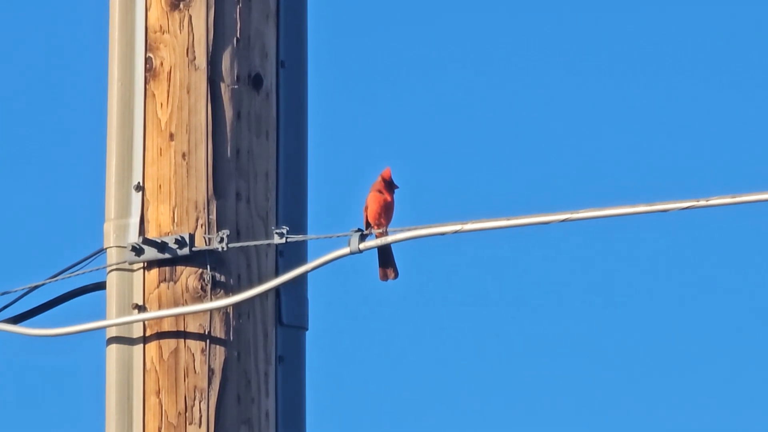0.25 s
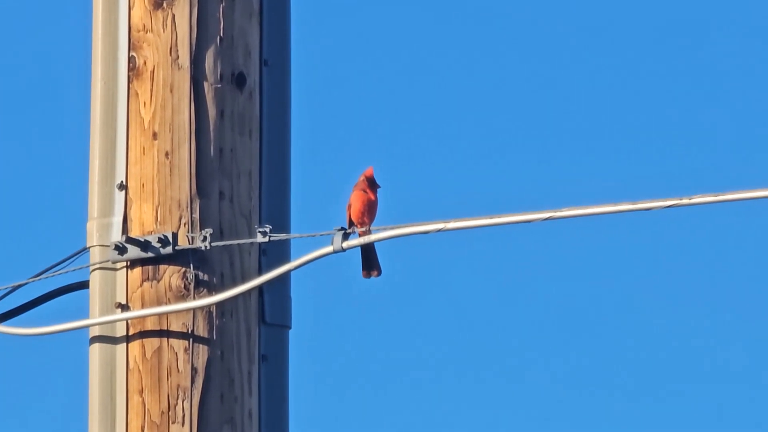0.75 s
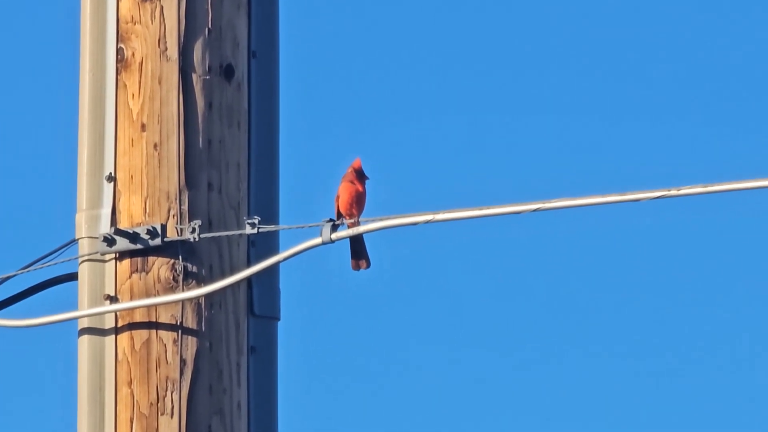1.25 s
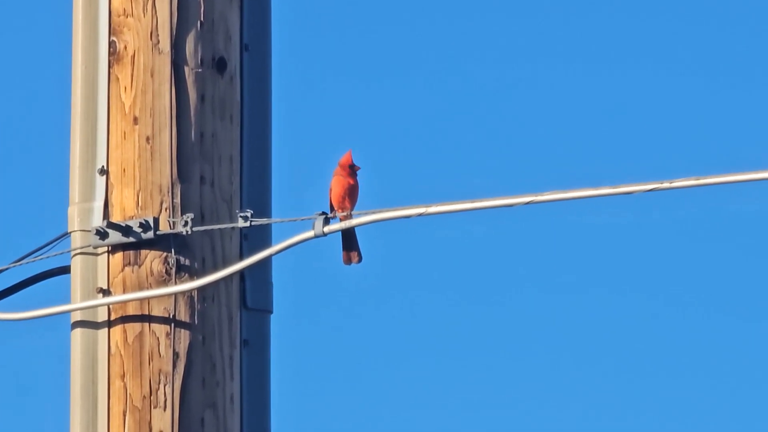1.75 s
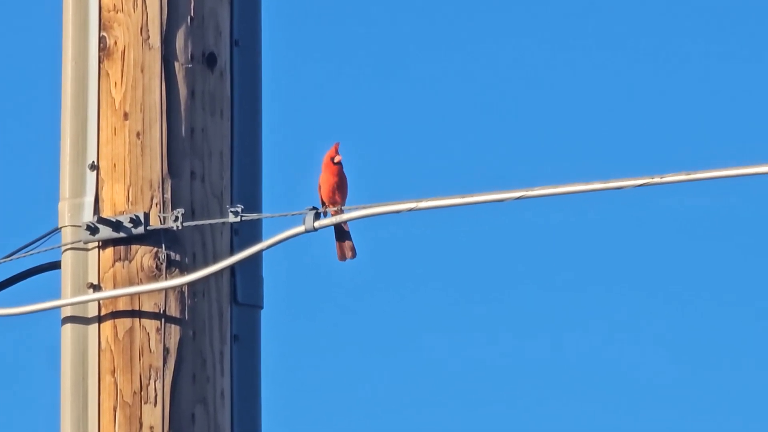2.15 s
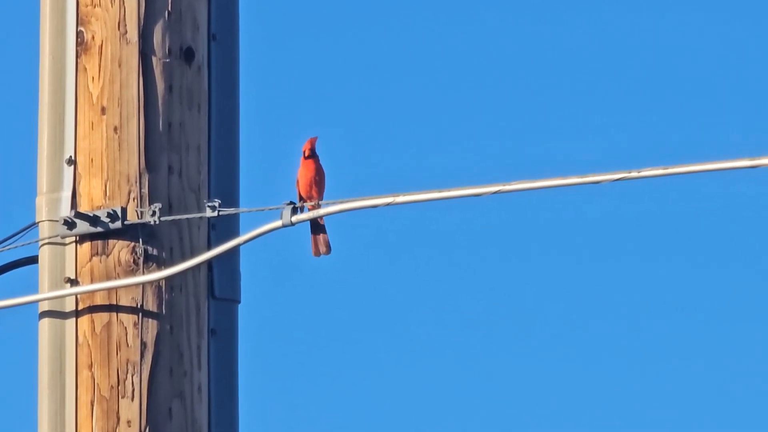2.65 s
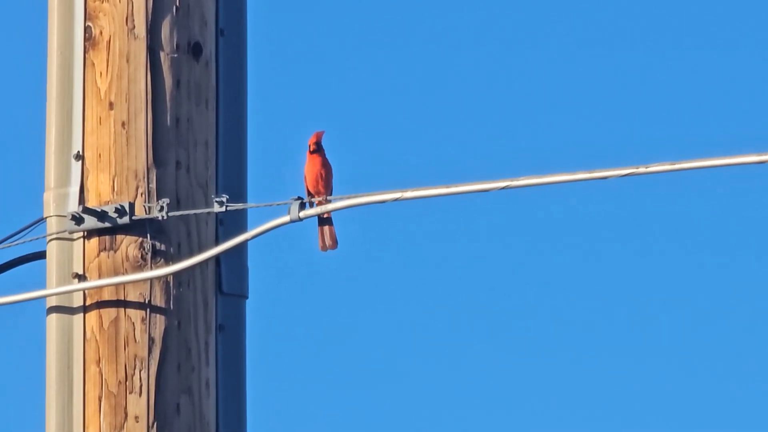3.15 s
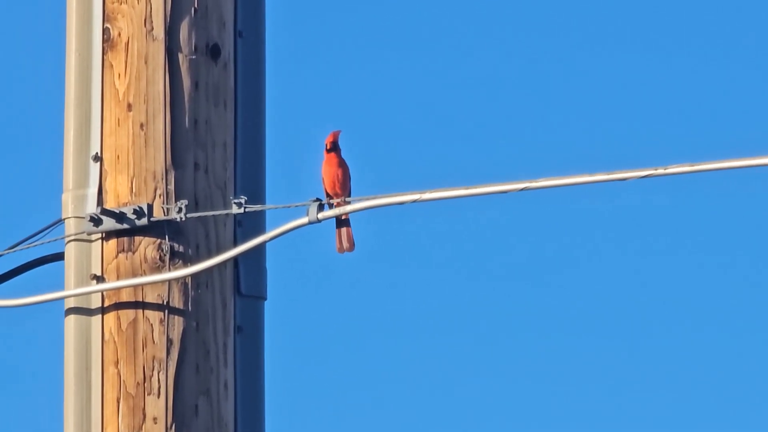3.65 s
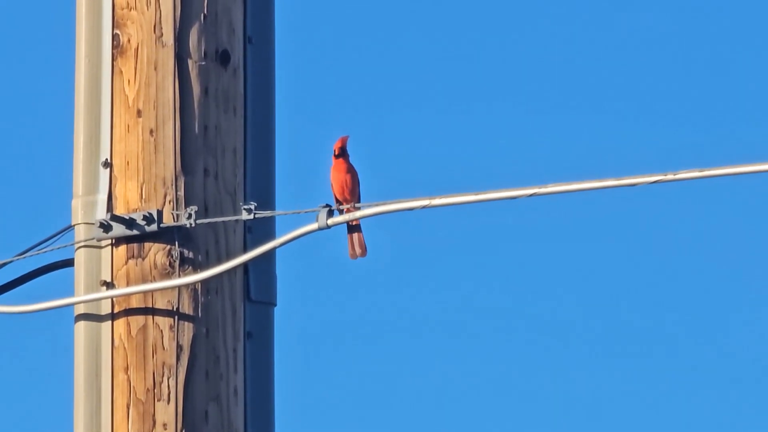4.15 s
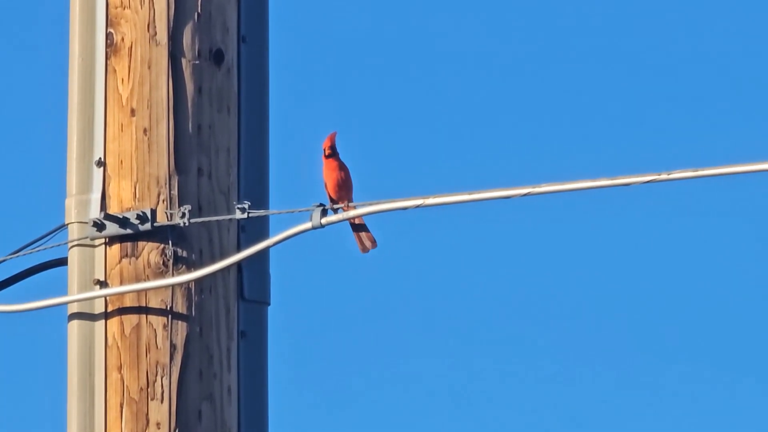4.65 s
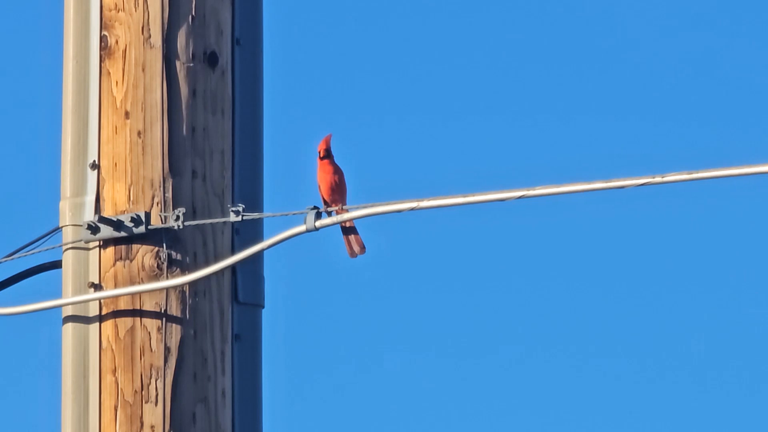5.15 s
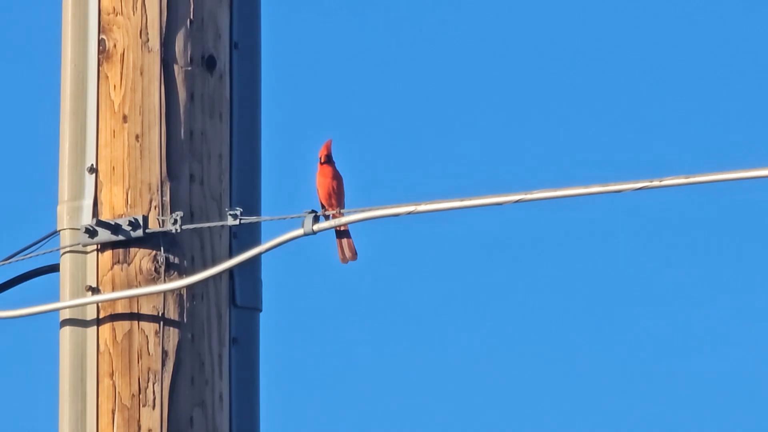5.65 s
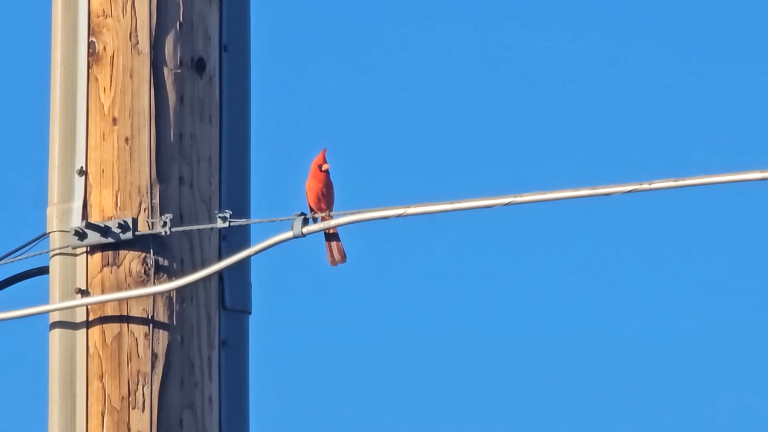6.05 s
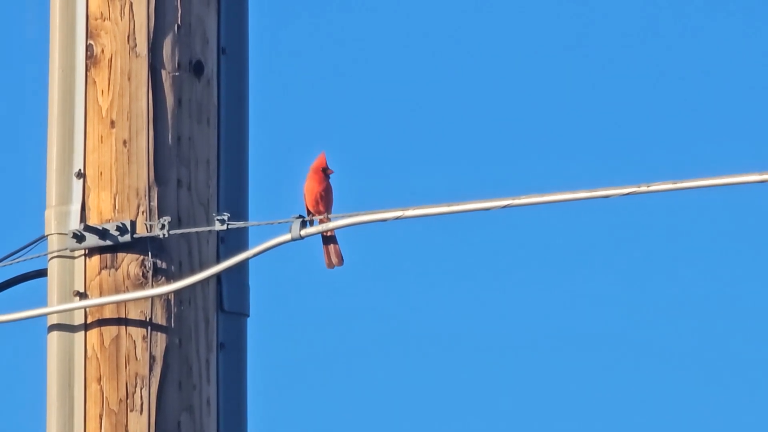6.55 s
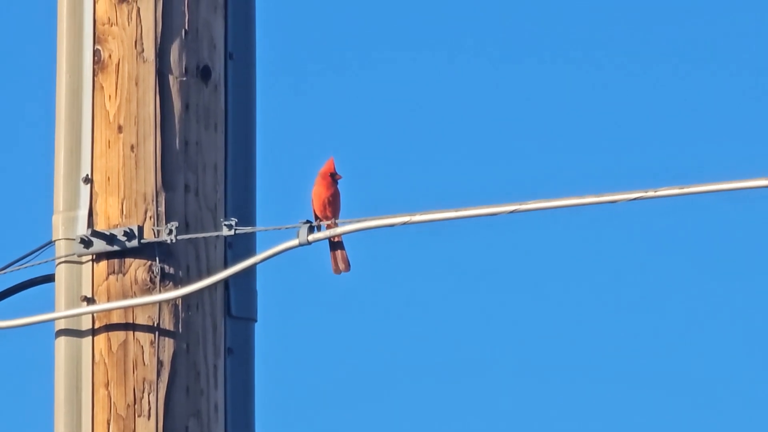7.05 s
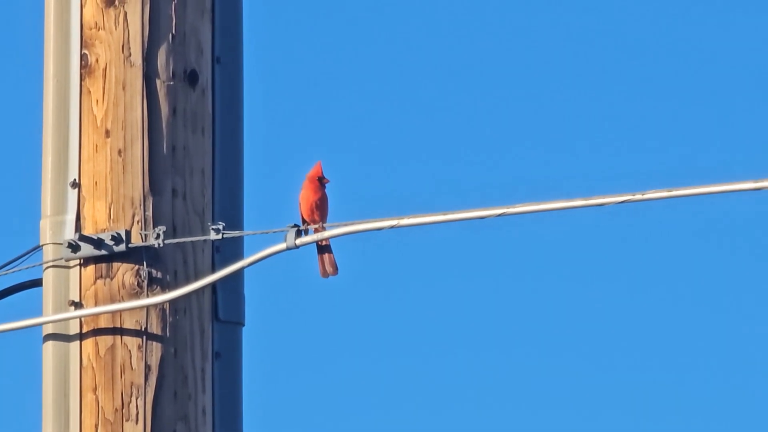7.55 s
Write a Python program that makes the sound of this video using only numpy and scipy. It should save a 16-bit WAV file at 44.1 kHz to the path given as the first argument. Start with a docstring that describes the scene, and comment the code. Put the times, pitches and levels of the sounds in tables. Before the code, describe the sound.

Outdoors by a street, traffic rumbles steadily while a distant engine drones and faint birds chirp far away. After about two seconds a cardinal sings three thin rising notes, growing louder, then ten clear, quick, down-slurred whistles with a short echo. The song stops and the rumble and far chirps carry on. A hand rustles faintly on the microphone.

```python
"""Cardinal over a street.

A cardinal on a wire sings three rising notes, then ten arched, down-slurred whistles, using both sides
of its syrinx. A close reflection ripples each glide; the street returns a short tail. Far birds answer.
Traffic rumbles, a distant engine pulls, a machine hums, and a hand rustles faintly on a camera grip."""
import sys
import numpy as np
from scipy import signal
from scipy.fft import rfft, irfft
from scipy.io import wavfile
from scipy.ndimage import uniform_filter1d

SR = 44100
rng = np.random.default_rng(int(sys.argv[2]) if len(sys.argv) > 2 else 0)


def master(y):
    """Save y as 16-bit WAV."""
    cut = np.clip(np.atleast_2d(y).T, -1, 1)
    pcm = np.round(cut * 32767)  # scale
    wavfile.write(sys.argv[1], SR, pcm.astype(np.int16))


N = 344421

# Note contours: offset_s, base_pitch_hz, relative_db
UPSLUR_SHAPE = [(-.125, 3940, -39), (-.1, 4310, -24), (-.07, 5010, -13), (-.055, 5270, -15.5),
                (-.04, 5960, -6), (-.025, 6400, -6), (-.01, 6520, -6), (0, 6840, -15), (.01, 6890, -16)]
DOWNSLUR_SHAPE = [(-.012, 3680, -15), (-.005, 3635, -8.5), (.005, 3520, -20), (.016, 3314, -5),
                  (.03, 2730, -9.5), (.045, 2550, -10.5), (.06, 2514, -29)]
HOOK_SHAPE = [(-.018, 3740, -22), (-.008, 3920, -16), (-.003, 4765, 4.5), (.002, 5144, 0), (.009, 4950, -1),
              (.016, 4410, -12.5), (.026, 3870, -23)]
FLICK_SHAPE = [(-.012, 3837, -21.5), (-.006, 3887, -27.5), (-.002, 4064, -12.5), (.003, 4540, -2.5),
               (.006, 5090, -21), (.008, 6200, -11.5), (.012, 6060, -15)]
SWOOP_SHAPE = [(-.07, 2506, -30), (-.057, 2393, -17.5), (-.039, 2078, -16.5), (-.028, 2230, -7.5),
               (-.008, 2828, -4.5), (.003, 2860, 0.5), (.014, 2580, -10), (.055, 1865, -8.5),
               (.095, 1350, -32)]
ARCH_SHAPE = [(-.047, 1852, -34), (-.038, 1850, -10), (-.021, 2330, -5), (-.01, 2684, -2), (.003, 2791, -1),
              (.02, 2425, -7), (.05, 1920, -7), (.08, 1455, -17), (.093, 1480, -24)]
# Rising notes: time_s, pitch_ratio, gain_db, overtone_boost_db
UPSLUR_NOTES = [(2.335, 0.93, -35, 21.6), (2.814, 0.97, -30, 12.7), (3.208, 0.97, -26.5, 7.6)]
# Other opening notes: time_s, pitch_ratio, gain_db
DOWNSLUR_NOTES = [(2.623, 0.99, -39), (3.02, 0.99, -31.5)]
HOOK_NOTES = [(3.308, 0.98, -32), (3.543, 0.92, -33.5)]
SWOOP_NOTES = [(3.367, 1.012, -23), (3.61, 0.98, -22)]
# Quick run, flick then arch: arch_top_s, arch_pitch_ratio, flick_pitch_ratio, gain_db
RUN_SYLLABLES = [(3.8528, 1.023, 0.91, -23.5), (4.091, 1.02, 0.91, -23.5), (4.3249, 1, 0.9, -23),
                 (4.56, 1.01, .94, -22.5), (4.7936, 1.003, 0.92, -22), (5.0268, 1.004, 0.93, -22.5),
                 (5.2618, 1, 0.9, -22.5), (5.4987, .99, 0.9, -23)]
# Syrinx overtones: harmonic, high_side_db, low_side_db
SYRINX_OVERTONES = [(2, -37.5, -39), (3, -61, -49), (4, -64, -67), (5, -64, -50), (6, -70, -47.5)]
# Wall reflections: delay_ms, left_db, right_db
WALL_ECHOES = [(13.94, -10, -17), (21, -18.5, -17.5), (34.7, -24, -26.5), (47.9, -25, -23),
               (66, -35.5, -34), (92, -45.5, -43)]
# Street decay: freq_hz, base_t60_s
STREET_DECAY = [(1500, 0.7), (3000, 0.5), (5000, 0.83), (8000, 0.15), (15000, 0.14)]
# Microphone port response toward the bird: freq_hz, gain_db
LEFT_RESPONSE = [(1500, -8.5), (2800, 1.5), (3500, 2.5), (4200, -1), (4900, -3), (5800, -0.5), (6500, 1),
                 (7500, 8), (10000, 4), (12500, 2), (15000, 2.5)]
RIGHT_RESPONSE = [(1500, -9.5), (2800, 2), (3500, 7.5), (4200, 9.5), (4900, 7.5), (5800, -11.5),
                  (6500, -12), (7200, -18), (10000, 7), (12500, 13), (15000, -8.5)]

# Far glides: length_s, start_pitch_ratio, end_pitch_ratio
WHIP_UP, WHIP_DOWN = (.014, .68, 1.03), (.078, 1, .6)
LIFT, DIP = (.065, .64, 1.01), (.05, .96, .83)
# Far up-down calls: turn_s, pitch_hz, level_db
WHIP_CALLS = [(.077, 4820, -58), (.68, 4720, -56.5), (1.0, 4890, -55), (1.35, 4390, -55),
              (1.969, 5100, -52.5), (2.111, 4640, -55), (6.12, 4500, -59), (7.03, 5094, -46),
              (7.069, 4290, -49), (7.143, 4660, -63), (7.408, 3500, -60.5)]
# Far rising and sagging calls: start_s, pitch_hz, level_db
LIFT_CALLS = [(.765, 3720, -52), (.955, 4010, -56), (1.14, 4500, -64), (6.49, 3450, -54.5),
              (6.715, 4870, -55), (7.53, 5430, -70)]
DIP_CALLS = [(1.209, 4280, -56), (3.7, 4850, -47), (3.888, 4430, -45), (5.099, 4880, -51),
             (5.298, 4650, -49.5), (5.529, 4900, -48.5)]
# Far burry calls and thin peeps: start_s, length_s, start_hz, end_hz, level_db
BURR_CALLS = [(0, 0.92, 2146, 2196, -64), (6.36, 0.19, 4490, 3880, -59), (6.63, .22, 2386, 2765, -53)]
PEEP_CALLS = [(.68, 0.047, 6080, 6050, -62), (1.85, 0.065, 6090, 6070, -63.5),
              (3.665, 0.039, 6070, 6030, -55.5)]

# Traffic spectrum: freq_hz, density_db
TRAFFIC_SPECTRUM = [(20, -24.5), (45, -1), (70, -0.5), (115, -1), (165, -7.5), (240, -10.5), (330, -23),
                    (480, -25), (650, -20), (820, -24), (980, -30.5), (1300, -31), (1700, -42), (4400, -48),
                    (6500, -65.5)]
# Left-right noise likeness: freq_hz, correlation (clipped to +-1 in use)
PORT_CORRELATION = [(30, 0.83), (150, 1), (300, 0.89), (600, 0.58), (1200, 1), (3000, -1.2), (5000, 0.51),
                    (8000, 0.4), (12000, 0.13)]
# Engine speed: time_s, firing_hz
FIRING_RATE = [(0, 78), (.6, 81), (.9, 86), (1.3, 91), (1.6, 90), (2, 93), (2.8, 94.5), (3.2, 97.5),
               (3.9, 98.5), (4.5, 101), (5.3, 102), (7.8, 104)]
# Exhaust lines: harmonic, relative_db
EXHAUST_LINES = [(1, 1), (1.5, -17.5), (2, -26)]
# Engine pulls: start_s, length_s, crest_fraction, crest_db
ENGINE_PULLS = [(0.34, 0.046, 0.46, -29.5), (0.637, 0.68, 0.8, -23.5), (1.588, 0.46, 0.41, -25.5),
                (2.374, .09, 0.67, -35), (2.776, 0.095, 0.39, -23), (3.006, 1.56, 0.47, -23.5),
                (4.72, 0.59, 0.63, -29), (5.755, 0.051, 0.46, -31.5), (6.677, 0.047, 0.33, -27.5),
                (6.96, 0.22, 0.51, -30)]
# Machine lines: freq_hz, level_db
HUM_LINES = [(68.5, -42.5), (137, -47.5), (205, -48), (343, -62), (411, -65), (480, -65)]
# Machine swell: time_s, gain_db
HUM_SWELL = [(0, 0), (2, 0), (3.2, 7), (4.6, 6.5), (6, 1), (7.8, 4)]
# Grip friction spectrum: freq_hz, density_db
GRIP_SPECTRUM = [(500, -20.5), (2000, -1.5), (4500, 7), (6000, -5), (10000, -9), (11000, -8), (11600, 1),
                 (12400, -3.5), (15500, -4.5)]
# Grip friction envelope: time_s, level_db
GRIP_ENVELOPE = [(0, -74), (1.5, -71), (2.6, -70.5), (3.7, -66), (4.2, -72), (5.3, -73), (5.8, -78.5),
                 (7.1, -78.5), (7.8, -85)]
# Clearest grip ticks: start_s, level_db
GRIP_TICKS = [(.1401, -54), (1.545, -47), (1.763, -46), (1.7774, -53), (1.792, -46.5), (2.1234, -53),
              (2.6507, -43), (2.9143, -50), (3.7482, -35.5), (3.7945, -38), (5.456, -39)]


def cardinal(near_ms=2.79, near_db=-3, tail_db=-19, port_lag_ms=.043):
    """Song beating against a close reflection, then echoes and tail. The left port leads."""
    voice = song()
    near = voice + gain_of(near_db) * delayed(voice, near_ms)
    left, right = near + walls(near)
    right = delayed(right, port_lag_ms)
    direct = np.array([colour(left, LEFT_RESPONSE), colour(right, RIGHT_RESPONSE)])
    # Scatter arrives from all sides: same colour at both ports.
    scattered = (colour(near, LEFT_RESPONSE) + colour(near, RIGHT_RESPONSE)) / 2
    return direct + gain_of(tail_db) * street(scattered, stretch=1)


def song(flick_lead_s=.072, flick_db=-2.3, flick_bright_db=7):
    """High and low syrinx sides alternate. Long glides are pure, flicks unsteady and raspy."""
    _, high_db, low_db = np.transpose(SYRINX_OVERTONES)
    flicks = [(s - flick_lead_s, ratio, db + flick_db) for s, _, ratio, db in RUN_SYLLABLES]
    arches = [(s, ratio, db) for s, ratio, _, db in RUN_SYLLABLES]
    return (phrase(UPSLUR_SHAPE, UPSLUR_NOTES, high_db, waver=.009, rasp_db=-55)
            + phrase(DOWNSLUR_SHAPE, DOWNSLUR_NOTES, low_db, waver=.009, rasp_db=-33)
            + phrase(HOOK_SHAPE, HOOK_NOTES, high_db, waver=.014, rasp_db=-22)
            + phrase(FLICK_SHAPE, flicks, high_db + flick_bright_db, waver=.071, rasp_db=-19)
            + phrase(SWOOP_SHAPE, SWOOP_NOTES, low_db, waver=.0035, rasp_db=-40)
            + phrase(ARCH_SHAPE, arches, low_db, waver=.0035, rasp_db=-43.5))


def phrase(shape, notes, overtones_db, waver, rasp_db):
    """All notes of one contour."""
    out = np.zeros(N)
    for time_s, pitch_ratio, db, *boost_db in notes:
        note = whistle(shape, pitch_ratio, overtones_db + sum(boost_db), waver, rasp_db)
        add(out, time_s + shape[0][0], gain_of(db) * note)
    return out


def whistle(shape, pitch_ratio, overtones_db, waver, rasp_db, leak_db=21, shimmer_db=3):
    """Near-pure syrinx tone with shimmering overtones. Low pitches leak more octave."""
    t = np.arange(shape[0][0], shape[-1][0], 1 / SR)
    base_hz, envelope_db = (uniform_filter1d(column, size=130) for column in follow(shape, t))
    pitch_hz = base_hz * pitch_ratio
    jitter = waver * drift(970, size=8192)[:len(t)]
    phase = 2 * np.pi * np.cumsum(pitch_hz * (1 + jitter)) / SR
    octave_db = leak_db * np.clip(np.log2(2600 / base_hz), 0, 1)
    tone = np.sin(phase) + gain_of(rasp_db) * rng.standard_normal(8192)[:len(t)]
    for k, overtone_db in enumerate(overtones_db, 2):
        level_db = overtone_db + shimmer_db * drift(110, size=8192)[:len(t)] + octave_db * (k == 2)
        tone += gain_of(level_db) * np.sin(k * phase) * (k * pitch_hz < SR / 2)
    return tone * gain_of(envelope_db) * signal.windows.tukey(len(t), .06)


def walls(x, sway_ms=.084, fade_db=2):
    """Echo paths shift as the microphone sways and the bird turns."""
    index, out = np.arange(N), np.zeros((2, N))
    for delay_ms, left_db, right_db in WALL_ECHOES:
        lag_samples = (delay_ms + sway_ms * drift(2)) * SR / 1000
        level_db = np.array([[left_db], [right_db]]) + fade_db * drift(3.2)
        out += gain_of(level_db) * np.interp(index - lag_samples, index, x)
    return out


def street(x, stretch, gap_s=.008):
    """Scatter off walls and trees: random taps, top treble dying first. Stretch scales the decay time."""
    taps = rng.standard_normal((2, SR)) * (rng.random((2, SR)) < .1) * (np.arange(SR) > gap_s * SR)
    hz, t, spectra = signal.stft(taps, SR, nperseg=256)
    t60_s = stretch * spectrum_at(STREET_DECAY, hz)[:, None]
    _, tail = signal.istft(spectra * gain_of(-60 * t / t60_s), SR, nperseg=256)
    return signal.fftconvolve(x[None], tail / np.linalg.norm(tail[0]), axes=1)[:, :N]


def far_birds(direct_db=-3.5, early_db=-7, late_db=-6, peep_tail_db=-9):
    """Many paths give distant calls a flutter and a tail. Sagging calls ring less."""
    whips = glides(WHIP_UP, WHIP_CALLS, lead_s=WHIP_UP[0]) + glides(WHIP_DOWN, WHIP_CALLS)
    farthest = slurs(whips + glides(LIFT, LIFT_CALLS) + chatter(), waver=.024)
    farthest += slurs(BURR_CALLS, waver=.11)
    calls = farthest + slurs(glides(DIP, DIP_CALLS), waver=.013)
    peeps = slurs(PEEP_CALLS, waver=.002)
    early = gain_of(early_db) * street(calls, stretch=.29)
    late = gain_of(late_db) * street(farthest, stretch=2.3)
    peep_tail = gain_of(peep_tail_db) * street(peeps, stretch=.9)
    return gain_of(direct_db) * calls + early + late + peeps + peep_tail


def chatter(level_db=-65, spread_db=6, low_hz=3400, high_hz=5200, count=48):
    """Glide rows for faint random calls, half rising, half falling."""
    when, pitch, strength = rng.random((count, 3)).T
    pitch_hz = low_hz + (high_hz - low_hz) * pitch
    calls = np.transpose([when * N / SR, pitch_hz, level_db + spread_db * (strength - .5)])
    return glides(LIFT, calls[::2]) + glides(WHIP_DOWN, calls[1::2])


def glides(shape, calls, lead_s=0):
    """One row per call: start_s, length_s, start_hz, end_hz, level_db."""
    length_s, start_ratio, end_ratio = shape
    return [(s - lead_s, length_s, start_ratio * hz, end_ratio * hz, db) for s, hz, db in calls]


def slurs(rows, waver):
    """Gliding sine whistles with pitch jitter."""
    out = np.zeros(N)
    for start_s, length_s, start_hz, end_hz, db in rows:
        size = int(length_s * SR)
        pitch_hz = np.geomspace(start_hz, end_hz, size) * (1 + waver * drift(150, size=size))
        tone = np.sin(2 * np.pi * np.cumsum(pitch_hz) / SR)
        add(out, start_s, gain_of(db) * tone * signal.windows.tukey(size, .5))
    return out


def traffic(rumble_db=-35, roar_db=-50.5, rumble_rise_db=2, roar_rise_db=3, swell_db=1.9):
    """Rumble and tyre roar rise as traffic nears, with random swells."""
    nearest_s, width_s, split_hz = 3.9, 1.6, 350
    nearness = np.exp(-((np.arange(N) / SR - nearest_s) / width_s) ** 2 / 2)
    noise = stereo_noise(TRAFFIC_SPECTRUM)
    bass = signal.sosfiltfilt(signal.butter(4, split_hz, fs=SR, output="sos"), noise)
    rumble = gain_of(rumble_db + rumble_rise_db * nearness + swell_db * drift(6)) * unit_rms(bass)
    roar = gain_of(roar_db + roar_rise_db * nearness + swell_db * drift(15)) * unit_rms(noise - bass)
    return rumble + roar


def engine(gain_db=-1.5, idle_db=-41.5, flutter_db=1.43, throb_db=.85):
    """Distant exhaust note: climbs slowly, swells and throbs under load."""
    t = np.arange(N) / SR
    firing_hz, = follow(FIRING_RATE, t)
    phase = 2 * np.pi * np.cumsum(firing_hz) / SR
    exhaust = np.sqrt(2) * sum(gain_of(db) * np.sin(k * phase) for k, db in EXHAUST_LINES)
    load = np.maximum(gain_of(idle_db), sum(pull(t, *row) for row in ENGINE_PULLS))
    return load * gain_of(gain_db + flutter_db * drift(40) + throb_db * drift(5.5)) * exhaust


def pull(t, start_s, length_s, crest_fraction, crest_db, attack_s=.046, release_s=.16, droop_db=12.5):
    """Envelope of one engine pull: quick attack, rounded crest, release."""
    age_s = t - start_s
    gate = np.clip(np.minimum(age_s / attack_s, (length_s - age_s) / release_s) + 1, 0, 1)
    progress = np.clip(age_s / length_s, 0, 1)
    return gate * gain_of(crest_db - droop_db * (progress - crest_fraction) ** 2)


def machine_hum(flutter_db=3, waver=.003):
    """Machine at steady speed; its lines waver in transit."""
    swell_db, = follow(HUM_SWELL, np.arange(N) / SR)
    warped_s = np.cumsum(1 + waver * drift(3)) / SR
    return sum(gain_of(db + swell_db + flutter_db * drift(2.3)) * np.sin(2 * np.pi * hz * warped_s)
               for hz, db in HUM_LINES)


def grip_rustle(friction_gain_db=6, flicker_db=2, rub_db=1.5, tick_gain_db=-2, tick_decay_s=.004):
    """Uneven grip friction with dry ticks; faint ones fall at random while the hand shifts."""
    shift_end_s, faint_count, faint_boost_db = 7.4, 14, 16
    envelope_db, = follow(GRIP_ENVELOPE, np.arange(N) / SR)
    force = gain_of(friction_gain_db + envelope_db + flicker_db * drift(35) + rub_db * drift(6))
    faint_times_s = shift_end_s * rng.random(faint_count)
    faint_ticks = [(s, follow(GRIP_ENVELOPE, s)[0] + faint_boost_db) for s in faint_times_s]
    tick = np.exp(-np.arange(2000) / SR / tick_decay_s)
    for start_s, db in GRIP_TICKS + faint_ticks:
        add(force, start_s, gain_of(db + tick_gain_db) * tick)
    return force * stereo_noise(GRIP_SPECTRUM)


def stereo_noise(spectrum):
    """Coloured noise at two ports, alike in the bass; rms 1."""
    hz = np.fft.rfftfreq(N, 1 / SR)
    left, independent = rfft(rng.standard_normal((2, N)))
    correlation = np.clip(spectrum_at(PORT_CORRELATION, hz), -1, 1)
    right = correlation * left + np.sqrt(1 - correlation ** 2) * independent
    return unit_rms(irfft(np.array([left, right]) * gain_of(spectrum_at(spectrum, hz)), N))


def drift(rate_hz, size=N):
    """Low-passed random wander; rms 1."""
    hz = np.fft.rfftfreq(size, 1 / SR)
    return unit_rms(irfft(rfft(rng.standard_normal(size)) / (1 + (hz / rate_hz) ** 4), size))


def colour(x, response):
    """Zero-phase filter from rows of freq_hz, gain_db."""
    hz = np.fft.rfftfreq(2 * N, 1 / SR)
    return irfft(rfft(x, 2 * N) * gain_of(spectrum_at(response, hz)))[..., :N]


def delayed(x, delay_ms):
    """Fractional-sample delay."""
    hz = np.fft.rfftfreq(2 * N, 1 / SR)
    return irfft(rfft(x, 2 * N) * np.exp(-2j * np.pi * hz * delay_ms / 1000))[:N]


def spectrum_at(rows, hz):
    """Interpolate over log frequency."""
    freq_hz, values = np.transpose(rows)
    return np.interp(np.log(hz + 1), np.log(freq_hz + 1), values)


def follow(rows, t):
    """Interpolate each column over time."""
    time_s, *columns = np.transpose(rows)
    return [np.interp(t, time_s, column) for column in columns]


def add(mix, start_s, sound):
    """Mix in place from start_s."""
    part = mix[max(round(start_s * SR), 0):][:len(sound)]
    part += sound[:len(part)]


def gain_of(db):
    """Decibels to amplitude."""
    return 10 ** (np.asarray(db) / 20)


def unit_rms(x):
    """Scale to rms 1."""
    return x / np.sqrt(np.mean(x ** 2) + 1e-20)


def scene(road_pan_db=.5, road_lag_ms=.26):
    """Birds above the street. The road lies left: later and softer at the right port."""
    left, right = (traffic() + engine() + machine_hum()) * gain_of([[road_pan_db], [-road_pan_db]])
    road = np.array([left, delayed(right, road_lag_ms)])
    return cardinal() + far_birds() + road + grip_rustle()


def record(dry, cutoff_hz=15850):
    """Short end fades and a steep low-pass."""
    fades = signal.windows.tukey(N, .0005)
    lowpass = signal.firwin(511, cutoff_hz, window=("kaiser", 9), fs=SR)
    return signal.oaconvolve(dry * fades, lowpass[None], "same")


dry = scene()
out = record(dry)
master(out)
```